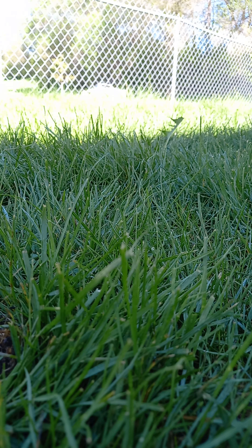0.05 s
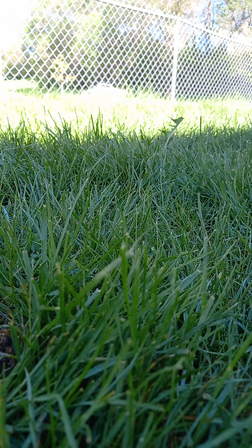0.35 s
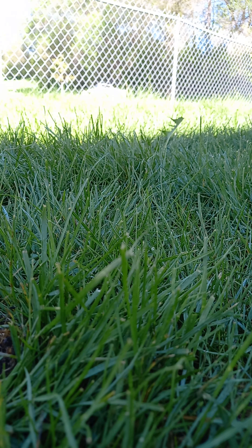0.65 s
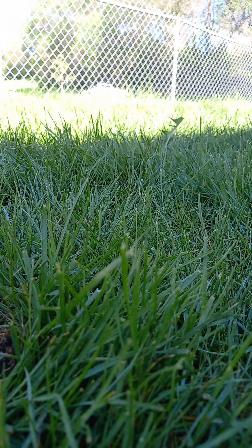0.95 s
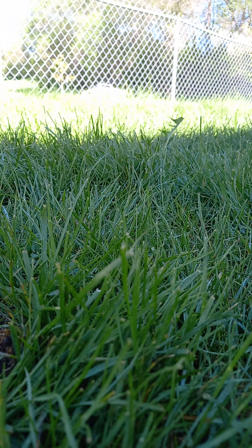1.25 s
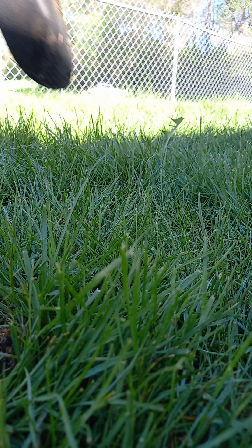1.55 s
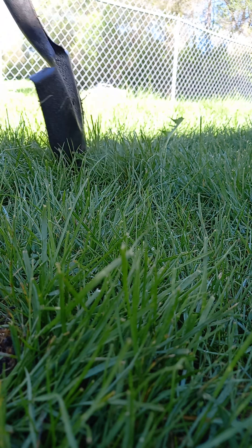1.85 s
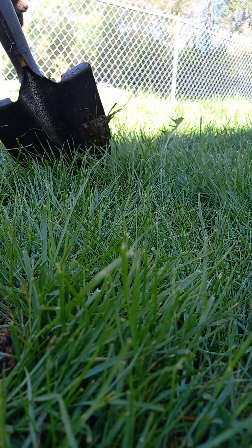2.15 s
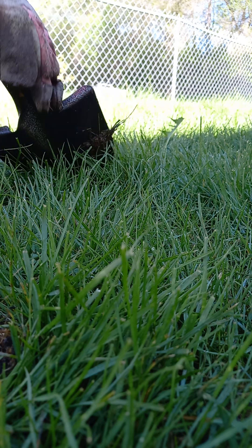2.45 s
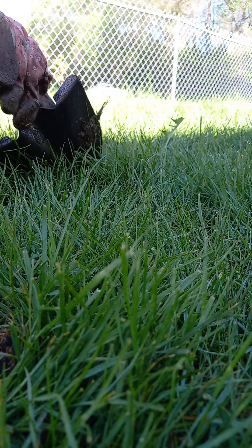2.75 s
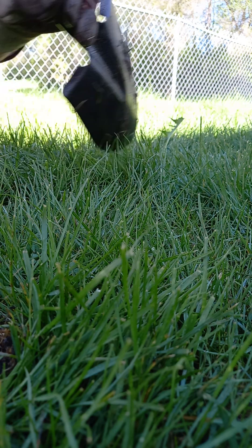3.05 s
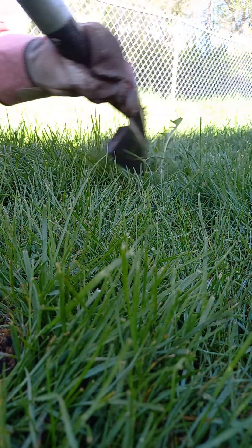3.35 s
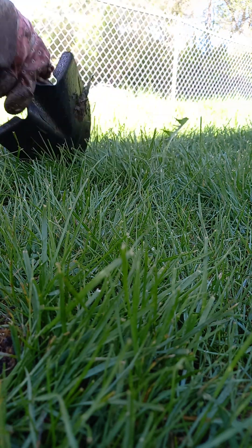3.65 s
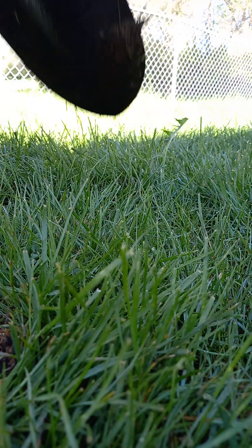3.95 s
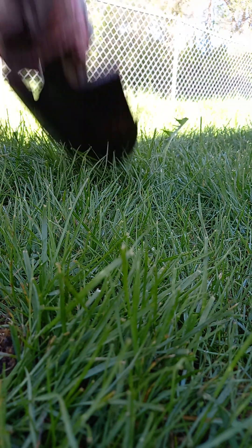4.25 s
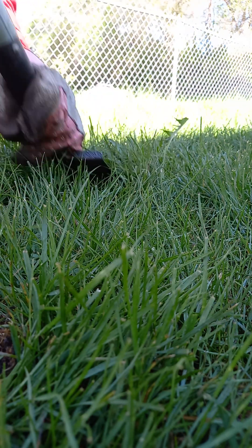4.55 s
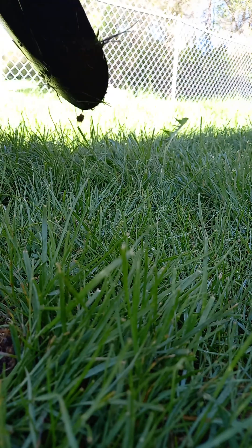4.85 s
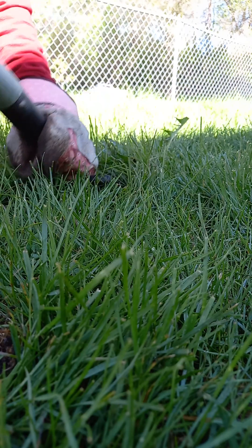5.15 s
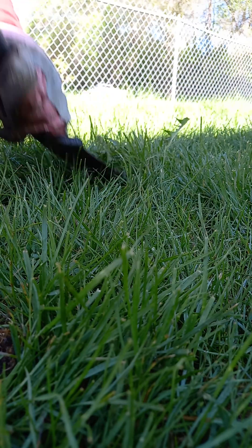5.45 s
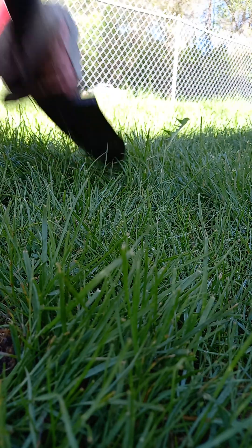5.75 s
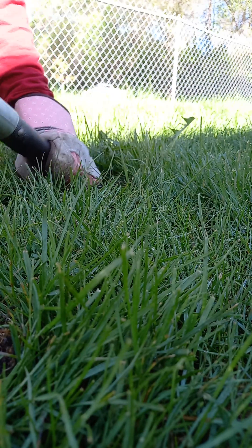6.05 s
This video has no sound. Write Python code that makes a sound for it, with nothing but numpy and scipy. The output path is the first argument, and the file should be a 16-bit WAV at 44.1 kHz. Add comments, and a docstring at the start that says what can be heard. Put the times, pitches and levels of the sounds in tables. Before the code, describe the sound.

Distant traffic rumbles steadily outdoors while a far motor's low hum swells and fades. Close to the microphone, a little to the left, a steel weeding spade scuffs through grass with small ticks and sharp snaps, squeaking briefly as it catches. Three hard jabs then thud into the soil, each with a handle knock and a short ring of the blade, and fine roots tear after the last two. A songbird whistles now and then.

```python
"""Distant traffic rumbles throughout, and a far motor's hum swells. Close by, a steel weeding spade starts
to work a lawn: grass flicks past it, turf scuffs, the plate hisses as it slides. A songbird whistles now
and then; the digging gives sharp snaps and small ticks. Around 3 s the steel catches and squeaks twice.
From 4.3 s, as the hum dies away, three hard jabs thud into the soil, knocking the handle and ringing the
blade; after the second and the third, fine roots tear under the pull."""
import sys
import numpy as np
from scipy import signal
from scipy.fft import rfft, irfft, next_fast_len
from scipy.io import wavfile
from scipy.ndimage import uniform_filter1d, map_coordinates

SR = 44100
rng = np.random.default_rng(int(sys.argv[2]) if len(sys.argv) > 2 else 0)


def dump_mix(stems):
    """Bounce the given channels to the path in sys.argv[1] as a 16-bit WAV at rate SR."""
    frames = np.atleast_2d(stems).T  # one column per channel
    limited = np.clip(frames, -1, 1)  # hard clip at full scale
    pcm = np.round(limited * 32767).astype(np.int16)
    wavfile.write(sys.argv[1], SR, pcm)


N = 278171
TIME = np.arange(N) / SR


def amp(db):
    """Decibels to gain."""
    return 10 ** (np.asarray(db) / 20)


def unit(x):
    """x at rms 1."""
    return x / np.sqrt(np.mean(x ** 2) + 1e-20)


def along(points, hz):
    """Read a (frequency, value) curve on a log axis."""
    knots_hz, values = np.transpose(points)
    return np.interp(np.log(hz + 1), np.log(knots_hz + 1), values)


def wobble(rate):
    """A smooth random curve, rate knots a second."""
    return map_coordinates(rng.standard_normal(int(N * rate / SR) + 4), [TIME * rate])


def filtered(x, response):
    """x through a complex frequency response."""
    n = x.shape[-1]
    padded = next_fast_len(n + 8192)
    return irfft(rfft(x, padded) * response(np.fft.rfftfreq(padded, 1 / SR)), padded)[..., :n]


def coloured(x, spectrum):
    """x through an EQ curve, at rms 1."""
    return unit(filtered(x, lambda hz: amp(along(spectrum, hz))))


def add(track, s, sound):
    """Mix a sound into a track at time s."""
    part = track[..., round(s * SR):][..., :sound.shape[-1]]
    part += sound[..., :part.shape[-1]]


def from_left(x, lead_ms):
    """Sound from the left reaches the left microphone port first."""
    return filtered(x, lambda hz: np.exp(np.outer([1, -1], 1j * np.pi * hz * lead_ms / 1000)))


def grains(spectrum, rate, spread_db):
    """Tiny random cracks of uneven size, rate a second, at rms 1."""
    sizes = rng.standard_normal(N) * amp(spread_db * np.clip(rng.standard_normal(N), -2, 2))
    return coloured(sizes * (rng.random(N) < rate / SR), spectrum)


def swell(t, rise, t60):
    """An envelope that rises from t = 0 and dies away."""
    t = np.maximum(t, 0)
    return (1 - np.exp(-t / rise)) * np.exp(-np.log(1000) * t / t60)


def effort(moves, shape=1.53):
    """Each move builds and eases off (shape 1 is pointed, 2 a bell); one gain curve per level column."""
    power = 0
    for s, rise, fall, *db in moves:
        away = np.maximum((s - TIME) / rise, (TIME - s) / fall)
        envelope = np.exp(-np.minimum(away, 10) ** shape)
        power = power + np.outer(amp(db), envelope) ** 2
    return np.sqrt(power)


def yard(x, t60):
    """Scattered echoes from fence and ground, different at each port."""
    t = np.arange(SR // 2) / SR
    tail = rng.standard_normal((2, len(t))) * swell(t, 0.0013, t60)
    return signal.fftconvolve(x[None], tail / np.linalg.norm(tail[0]), axes=1)[:, :N]


# Stereo image of the noise beds: (frequency [Hz], left-right correlation [0-1])
BED_LIKENESS = [(60, 0.97), (300, 0.85), (700, 0.33), (1300, 0), (2500, 0), (6000, 0)]

def noise_bed(spectrum):
    """Stereo noise of rms 1, centred in the bass and wide in the treble."""
    def width(hz):
        angle = np.arccos(along(BED_LIKENESS, hz)) / 2
        return np.array([np.cos(angle), np.sin(angle)])
    mid, side = filtered(rng.standard_normal((2, N)), width)
    return coloured(np.array([mid + side, mid - side]), spectrum)


# Low engine rumble and the softer wash of tyres: (frequency [Hz], EQ gain [dB])
ENGINE_EQ = [(25, -23), (40, -17), (52, -15), (66, -0.5), (95, 0), (120, 2.5), (160, -5), (215, -4),
             (280, -12), (380, -24), (600, -65)]
TYRE_EQ = [(150, -11.5), (280, 1), (400, -2.5), (560, -8.5), (800, -11), (1100, -22.5), (1500, -23),
           (2000, -26.5), (2700, -39.5), (5000, -55)]

def traffic(engine_db=-28, tyre_db=-38.5, tyre_rise_db_per_s=0.03):
    """Engines and tyres on far streets blend into a nearly steady bed."""
    engines = amp(engine_db + 0.6 * wobble(7)) * noise_bed(ENGINE_EQ)
    tyres = amp(tyre_db + tyre_rise_db_per_s * TIME + 0.27 * wobble(1.69)) * noise_bed(TYRE_EQ)
    return from_left(engines + tyres, lead_ms=0.089)


def motor(pitch_hz=194.7, drift_hz_per_s=0.809, peak_s=1.297, peak_db=-28, stop_s=4.29):
    """A far motor slowly speeds up; its one low note swells, fades and wavers on its way through the air."""
    since = TIME - peak_s
    hz = pitch_hz + drift_hz_per_s * since
    hum = unit(np.sin(2 * np.pi * np.cumsum(hz) / SR))
    db = peak_db - np.where(since < 0, 6 * since ** 2, 2.5 * since)  # rounded swell, steady fade
    running = np.clip(0.5 + 2 * (stop_s - TIME), 0, 1)  # half-second fade-out
    waver_db = 0.9 * wobble(6)
    return from_left(running * amp(db + waver_db) * hum, lead_ms=0.34)


# Thin, airy noise floor: (frequency [Hz], EQ gain [dB])
HISS_EQ = [(1470, -27), (2500, -3.5), (2830, -3), (3650, -3.5), (4530, -4), (7080, -13.5), (7950, -17.5),
           (8720, -18.5), (12000, -2.5), (15200, 0), (15800, -1)]

def microphone_hiss(level_db=-53):
    """The microphone's own faint, steady noise."""
    return amp(level_db) * noise_bed(HISS_EQ)


# Crisp grass and duller turf: (frequency [Hz], EQ gain [dB])
GRASS_EQ = [(300, -0.5), (600, 14), (1300, 3.5), (1950, 6.5), (2600, -7), (4000, -24), (6000, -22.5),
            (8500, -23.5), (12500, -33), (15800, -33)]
TURF_EQ = [(150, -1), (300, -4.5), (700, 4.5), (1000, -6.5), (1450, -7.5), (2200, -35), (4000, -32),
           (8500, -42.5), (13000, -24), (15800, -29)]
# Spade strokes through the lawn, cued at their greatest speed:
# (time [s], rise [s], fall [s], grass level [dB], turf level [dB], steel level [dB])
SPADE_STROKES = [(.46, 0.11, .15, -72, -45.5, -70), (.68, 0.033, .08, -55, -53.5, -58),
                 (1.595, 0.057, 0.2, -58, -41, -60), (2.125, .12, 0.065, -57.5, -38, -55),
                 (2.37, 0.087, 0.18, -59.5, -46, -60), (2.85, 0.14, .06, -62, -60, -57.5),
                 (3.46, 0.076, 0.1, -50, -45.5, -48), (3.92, 0.1, 0.14, -49.5, -50, -57),
                 (4.325, 0.02, 0.042, -37, -60, -56), (4.61, .05, 0.031, -45, -50, -68),
                 (5.295, 0.064, 0.027, -37, -43, -63), (6.125, 0.12, 0.047, -38.5, -41.5, -62.5)]

def strokes():
    """Grass blades flick past the spade, pressed turf crunches in small clumps, and the steel slides."""
    brushing, scuffing, sliding = effort(SPADE_STROKES)
    flicks_db, clumps_db = 1.5 * wobble(90), 2.2 * wobble(70)
    grass = brushing * amp(flicks_db) * grains(GRASS_EQ, rate=1200, spread_db=5)
    turf = scuffing * amp(clumps_db) * grains(TURF_EQ, rate=1500, spread_db=1)
    return grass + turf + sliding * steel_slide()


# Free resonances of the steel plate: (frequency [Hz], bandwidth [Hz], level [dB])
PLATE_MODES = [(1880, 380, 0), (2200, 350, -3), (2850, 450, -9), (3700, 600, -11)]
# Dry stems hissing over the steel: (frequency [Hz], EQ gain [dB])
STEM_EQ = [(1500, -17), (2800, 2), (5000, -6), (7500, -6.5), (10000, -8), (13000, 2), (15800, -8)]

def steel_slide(stem_db=-7.5):
    """Many tiny slips hiss and keep the plate's free resonances sounding."""
    def plate(hz):  # band-passes of alternating polarity
        return sum((-1) ** k * amp(db) * 1j * hz * width / (centre ** 2 - hz ** 2 + 1j * hz * width)
                   for k, (centre, width, db) in enumerate(PLATE_MODES))
    grip_db = 2.5 * wobble(60)
    ring = amp(grip_db) * unit(filtered(rng.standard_normal(N), plate))
    return ring + amp(stem_db) * coloured(rng.standard_normal(N), STEM_EQ)


# Birdsong, one slur a row:
# (time [s], length [s], start pitch [Hz], middle pitch [Hz], end pitch [Hz], relative level [dB])
SYLLABLES = [(.64, .11, 3690, 4070, 3290, -58.5), (1.319, 0.18, 3330, 2980, 3200, -61),
             (1.894, .04, 2270, 2340, 2600, -54), (2.528, 0.11, 3300, 3850, 3000, -62),
             (3.09, 0.09, 4000, 4260, 3950, -60), (4.44, 0.081, 3700, 4430, 3500, -61),
             (5.477, .115, 2590, 2350, 2850, -53.5), (5.585, 0.071, 2850, 3060, 2940, -57.5),
             (5.87, 0.11, 3140, 3070, 3230, -56.5), (6.221, 0.05, 2740, 2380, 2130, -49.5)]

def bird(burr_depth=0.032, burr_per_s=320, fade_s=0.014):
    """Slurred, slightly burry whistles, each one arc of pitch, blurred by distance."""
    song = np.zeros(N)
    burr = 1 + burr_depth * wobble(burr_per_s)
    for s, length, start_hz, middle_hz, end_hz, db in SYLLABLES:
        t = np.arange(round(length * SR)) / SR
        arc = np.polyfit([0, 0.5, 1], [start_hz, middle_hz, end_hz], 2)
        hz = np.polyval(arc, t / length) * np.roll(burr, -round(s * SR))[:len(t)]
        gate = np.clip(np.minimum(t, length - t) / fade_s, 0, 1)
        add(song, s, gate * amp(db) * np.sin(2 * np.pi * np.cumsum(hz) / SR))
    return 0.6 * from_left(song, lead_ms=0.07) + yard(song, t60=0.24)


# A dry, midrange crack: (frequency [Hz], EQ gain [dB])
CRACK_EQ = [(100, -17), (600, -3), (1400, 10.5), (2200, 4.5), (3000, -3.5), (4200, -6.5), (5500, -26),
            (8500, -50), (13000, -31), (15800, -30)]
# Sharp snaps and small ticks of digging: (time [s], relative peak [dB], tilt [dB/octave], left lead [ms])
DIGGING_SNAPS = [(0.7221, -39.5, 4, -0.32), (1.11, -46, 7, 0), (1.5796, -42, 1, 0.17),
                 (3.054, -41, 1, 0.12), (3.8527, -30, 7.5, -0.058), (3.901, -34.5, -1, 0.13),
                 (5.232, -30.5, -5.5, 0.31), (5.247, -34.5, -4, 0.41), (5.2717, -37, 0, 0.29),
                 (5.3004, -27.5, -4, 0.3), (5.3099, -31.5, 0, .34), (6.0527, -37.5, -1, 0.4),
                 (6.1344, -29, -7, 0.33), (6.2013, -32, -8.5, 0.35)]

def snaps(boost_db=10.5, preroll_s=0.005):
    """Each snap or tick is one sharp click with a brief noisy tail, with its own brightness and pan."""
    out = np.zeros((2, N))
    t = np.arange(SR // 20) / SR - preroll_s
    for s, db, tilt_db, lead_ms in DIGGING_SNAPS:
        crack = 0.12 * rng.standard_normal(len(t)) * swell(t, 0.0003, 0.014)  # the tail
        crack[round(preroll_s * SR)] = 1  # the click
        crack = coloured(crack, [(hz, level + tilt_db * np.log2(hz)) for hz, level in CRACK_EQ])
        add(out, s - preroll_s, amp(db + boost_db) * from_left(crack / np.abs(crack).max(), lead_ms))
    return out


# The sliding steel catches: (time [s], rise [s], fall [s], level [dB])
STEEL_CATCHES = [(2.85, .03, .03, -59), (3.462, 0.013, .02, -46)]

def squeak(pitch_hz=1850):
    """Brief stick and slip holds an unsteady note near the plate's lowest resonance."""
    grip, = effort(STEEL_CATCHES)
    hz = pitch_hz * (1 + 0.025 * wobble(400))
    return grip * unit(np.sin(2 * np.pi * np.cumsum(hz) / SR))


# Ring of the blade, damped by the soil: (frequency [Hz], level [dB], t60 [s])
BLADE_MODES = [(790, -2.5, 0.08), (815, 2.5, 0.043), (937, -2.5, 0.035), (1334, -1, 0.022),
               (1394, -18, 0.05), (1868, -12, 0.053), (2226, -16.5, 0.034), (2620, -47, .05)]
# Crunch of cut turf: (frequency [Hz], EQ gain [dB])
CRUNCH_EQ = [(120, 0), (260, -7.5), (480, -4.5), (650, -3.5), (850, -6.5), (1150, -9.5), (1500, -4.5),
             (2000, -13.5), (3000, -34), (4500, -32.5), (6000, -61), (8500, -52.5), (13000, -36.5),
             (15800, -38)]
# Three hits, the first two with a second bite; levels are relative:
# (time [s], thump level [dB], thump pitch [Hz], knock level [dB], knock pitch [Hz],
#  ring level [dB], crunch level [dB])
JAB_HITS = [(4.3284, -7, 92.4, -5, 266, -10.5, -9), (4.3384, -17, 143, -27, 262, -35, -15.5),
            (5.016, -30, 142, -9.5, 254, -10, -12.5), (5.043, -12, 110, -32, 240, -47, -32),
            (5.8436, -9.5, 130.5, -6, 286, -15.5, -14)]

def jabs(bite_s=0.0045, parting_s=0.0039, settle_s=0.0095, shank_hz=475, shank_db=-7, preroll_s=0.05):
    """The tip thumps the soil and knocks handle and shank; then the blade bites, rings and shears turf."""
    out = np.zeros(N)
    t = np.arange(SR // 4) / SR - preroll_s
    # shearing builds up as the tip parts the thatch, then settles
    shear = np.exp(np.minimum((t - bite_s) / parting_s, (bite_s - t) / settle_s))
    for s, thump_db, thump_hz, knock_db, knock_hz, ring_db, crunch_db in JAB_HITS:
        thump = amp(thump_db) * np.sin(2 * np.pi * thump_hz * t) * swell(t, 0.003, 0.15)
        handle = np.sin(2 * np.pi * knock_hz * t)
        shank = amp(shank_db) * np.sin(2 * np.pi * shank_hz * t)
        knock = amp(knock_db) * (handle + shank) * swell(t, 0.00022, 0.056)
        ring = 0
        for hz, db, t60 in BLADE_MODES:
            mode = amp(db + rng.normal(0, 1)) * np.sin(2 * np.pi * (hz * t + rng.normal(0, 0.3)))
            ring += mode * swell(t - bite_s, 0.00031, t60)
        crunch = coloured(rng.standard_normal(len(t)), CRUNCH_EQ) * shear
        add(out, s - preroll_s, thump + knock + amp(ring_db) * ring + amp(crunch_db - 0.5) * crunch)
    return out


# Pulls on the roots, cued at their greatest strain: (time [s], rise [s], fall [s], level [dB])
ROOT_PULLS = [(5.295, 0.046, .022, -47), (6.125, .1, 0.027, -52)]

def tearing(cracks_per_s=240):
    """Fine roots crack at random, harder as the strain builds."""
    strain, = effort(ROOT_PULLS)
    return strain * grains(CRACK_EQ, rate=cracks_per_s, spread_db=2)


# The spade's pan, shifting further left at about 4 s: (time [s], left lead [ms])
SPADE_PAN = [(0, 0.18), (3.95, 0.11), (4.25, 0.36), (6.31, 0.3)]

def panned(x):
    """The moving spade's sound reaches the two ports at slightly different moments."""
    lead_samples = np.interp(TIME, *np.transpose(SPADE_PAN)) * SR / 1000
    return np.array([map_coordinates(x, [np.arange(N) + side * lead_samples]) for side in (0.5, -0.5)])


def scene():
    """The spade is near and to the left, scattered by the ground; traffic, motor and bird are far."""
    spade = jabs() + strokes() + squeak() + tearing()
    ticks = snaps()
    digging = spade + ticks.mean(axis=0)
    thinned = filtered(digging, lambda hz: hz / (hz + 900))  # gentle low cut
    scatter = amp(-8) * yard(thinned, t60=0.012)
    echo = amp(-15) * yard(digging, t60=0.1)
    return panned(spade) + ticks + scatter + echo + traffic() + motor() + bird() + microphone_hiss()


def gain_control(x, threshold_db=-20, max_cut_db=1.5, recovery_db_per_s=1):
    """A loud blow ducks the gain a little; it creeps back slowly."""
    power = uniform_filter1d(np.mean(x ** 2, axis=0), size=512)
    level_db = 10 * np.log10(np.abs(power) + 1e-12)
    cut_db = np.clip(level_db - threshold_db, 0, max_cut_db)
    recovered_db = recovery_db_per_s * TIME
    return x * amp(recovered_db - np.maximum.accumulate(cut_db + recovered_db))


# The two microphone ports colour the treble differently: (frequency [Hz], left over right [dB])
PORT_BALANCE = [(100, 0), (1500, 0), (2200, 4), (3300, 0.5), (5000, 7), (7000, 13), (9000, -3), (11500, -4),
                (14000, 0.5)]

def record(dry, low_hz=48, ceiling_db=-1, top_hz=15830):
    """The microphone chain: port colour, low cut, gain control, soft overload and band limit."""
    ports = filtered(dry, lambda hz: amp(np.outer([0.5, -0.5], along(PORT_BALANCE, hz))))
    low_cut = signal.butter(4, low_hz, "high", fs=SR, output="sos")
    held = gain_control(signal.sosfilt(low_cut, ports))
    rounded = held / (1 + (held / amp(ceiling_db)) ** 10) ** (1 / 10)
    return filtered(rounded, lambda hz: hz < top_hz)


dry = scene()
out = record(dry)
dump_mix(out)
```